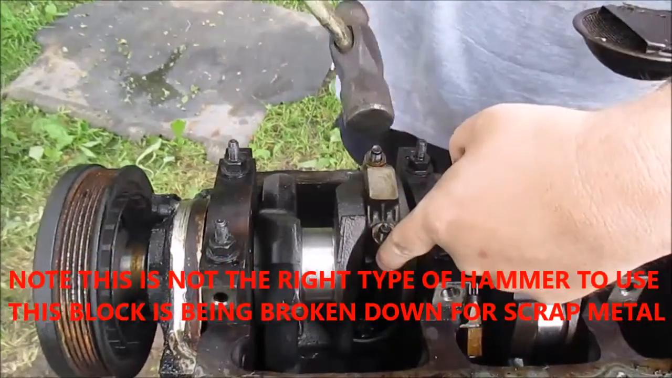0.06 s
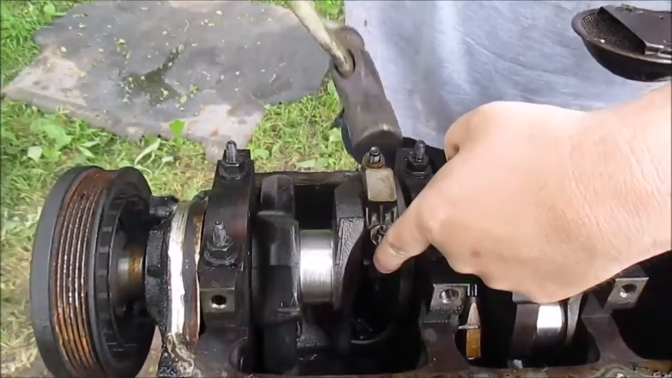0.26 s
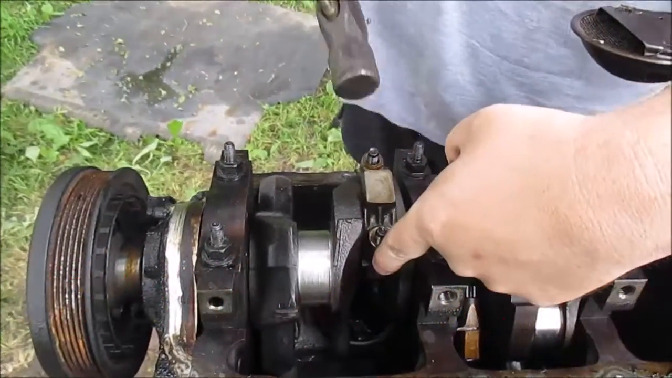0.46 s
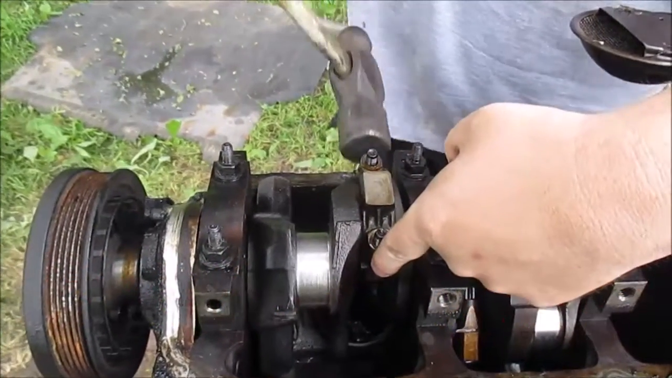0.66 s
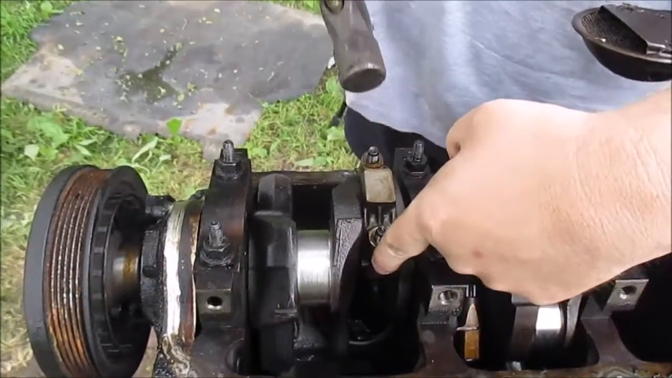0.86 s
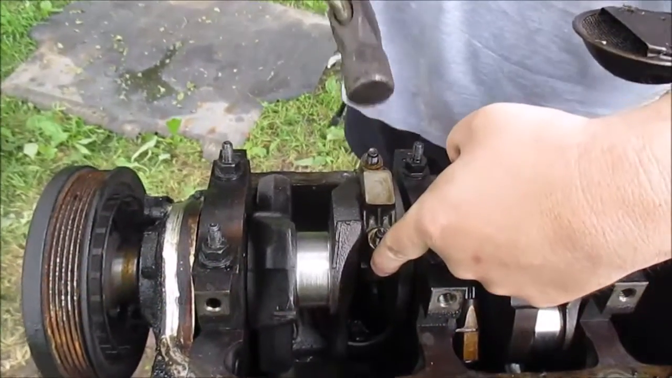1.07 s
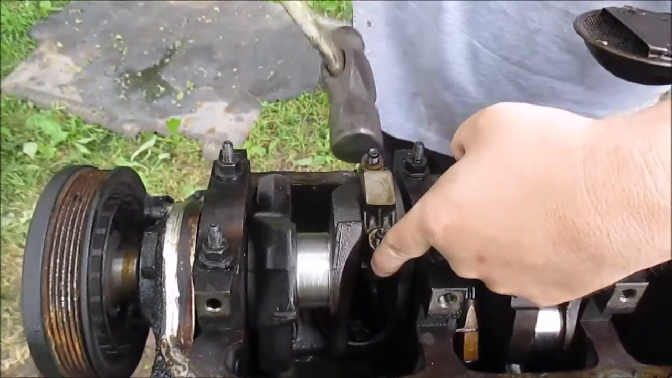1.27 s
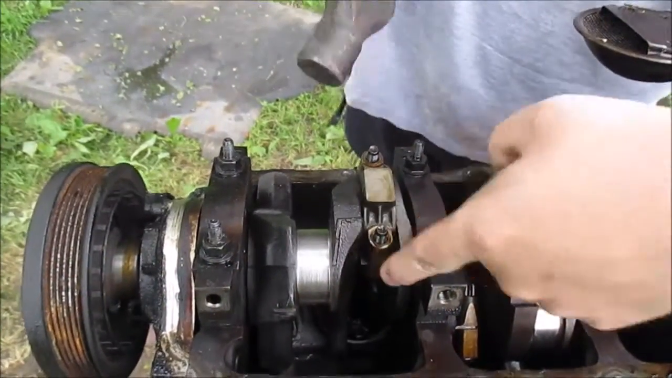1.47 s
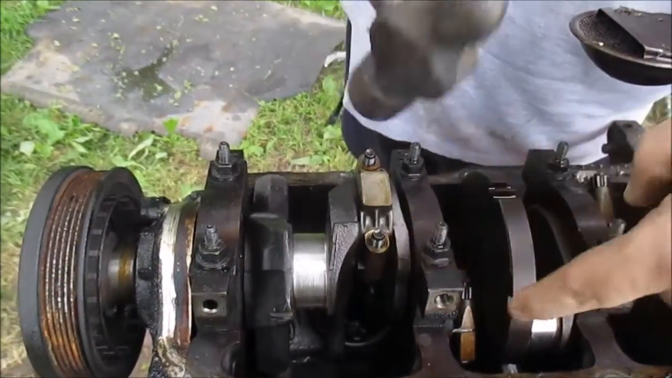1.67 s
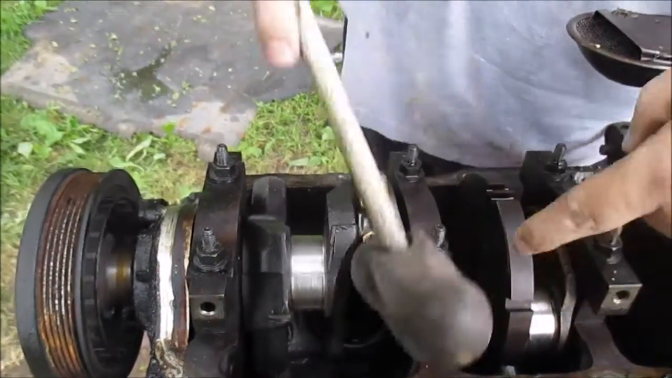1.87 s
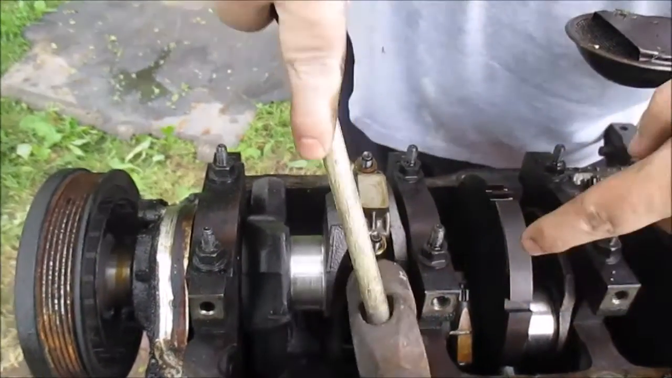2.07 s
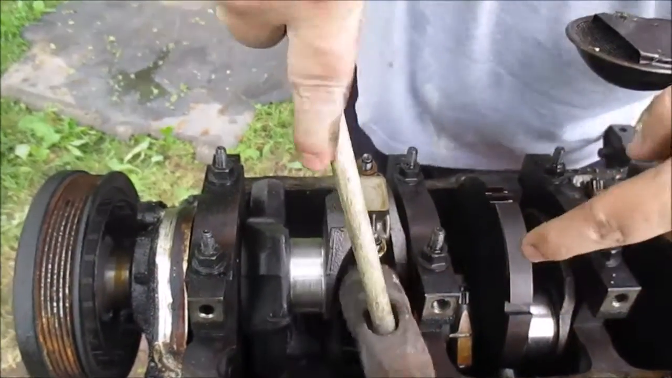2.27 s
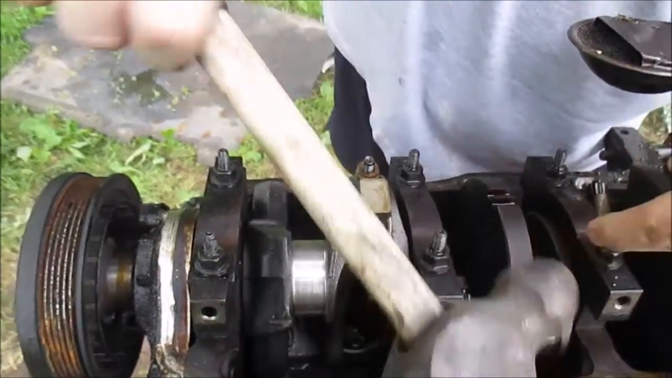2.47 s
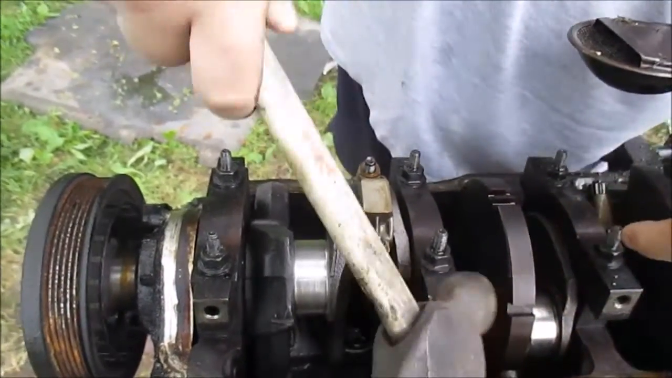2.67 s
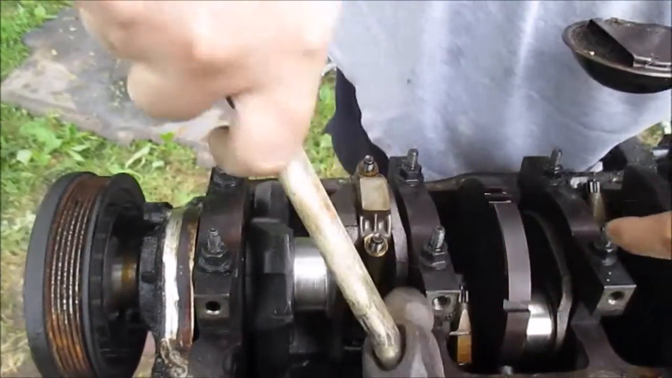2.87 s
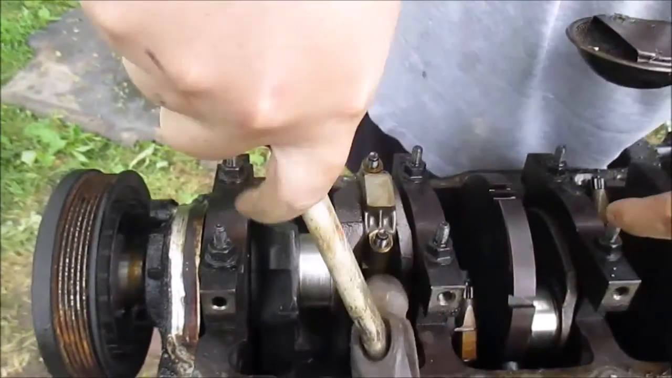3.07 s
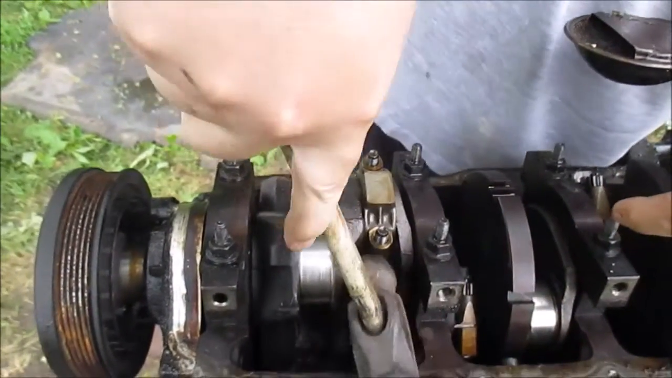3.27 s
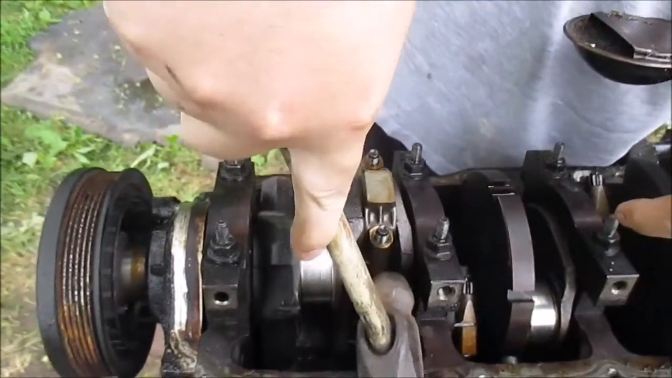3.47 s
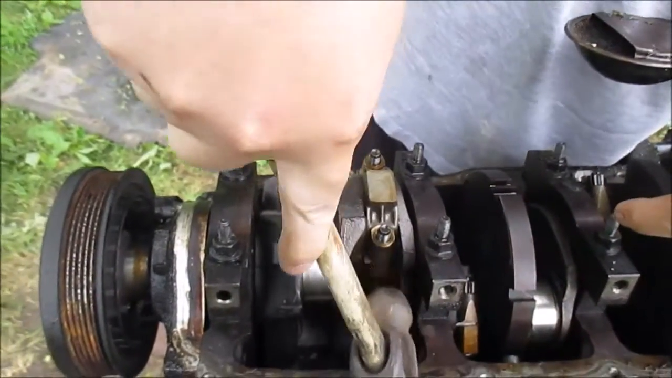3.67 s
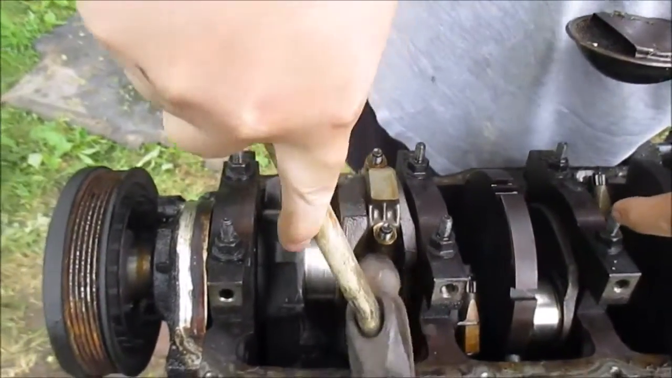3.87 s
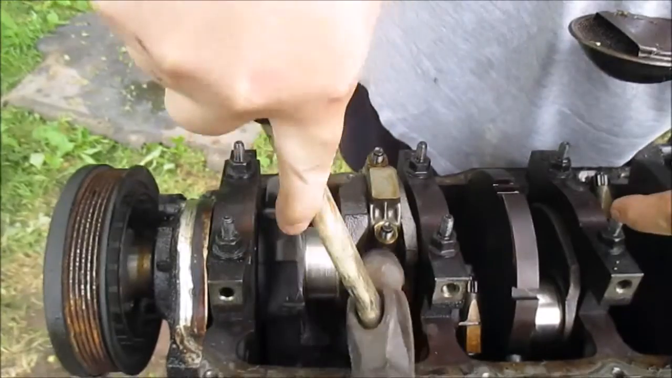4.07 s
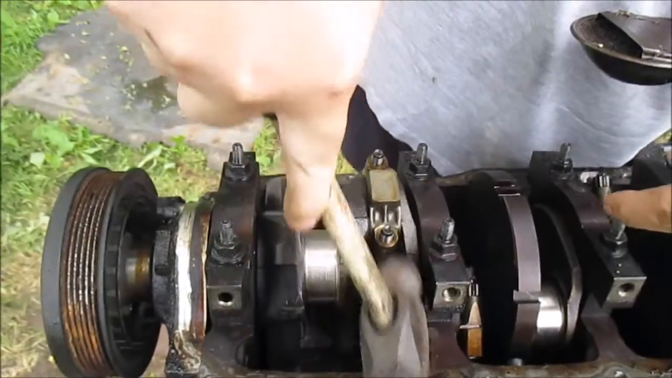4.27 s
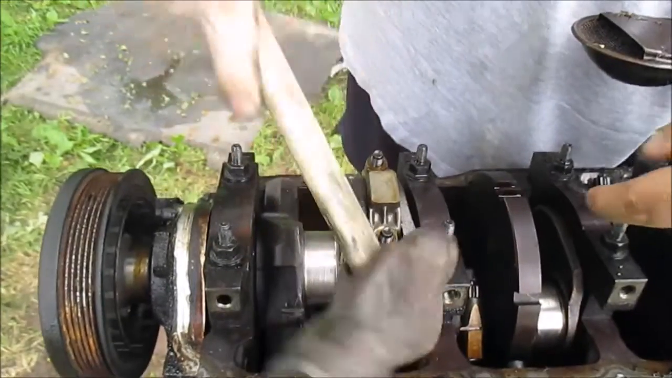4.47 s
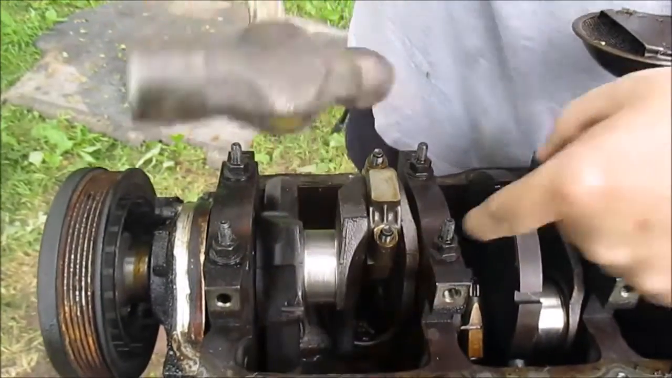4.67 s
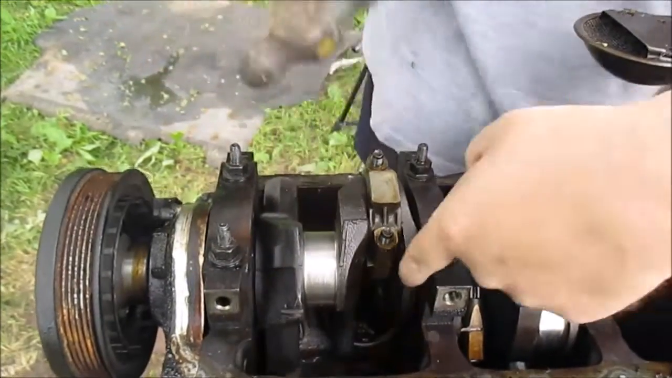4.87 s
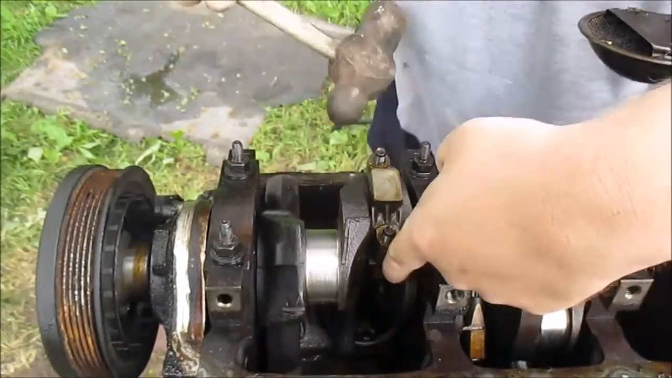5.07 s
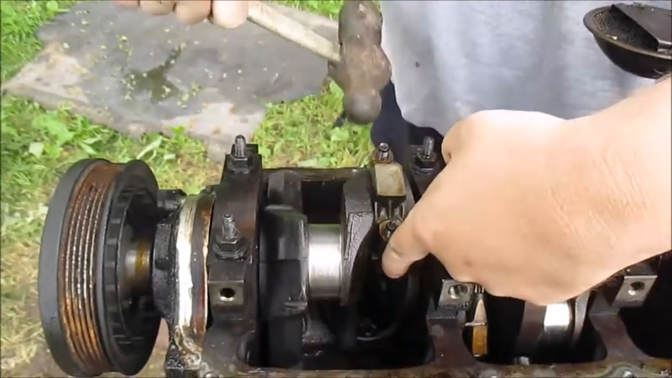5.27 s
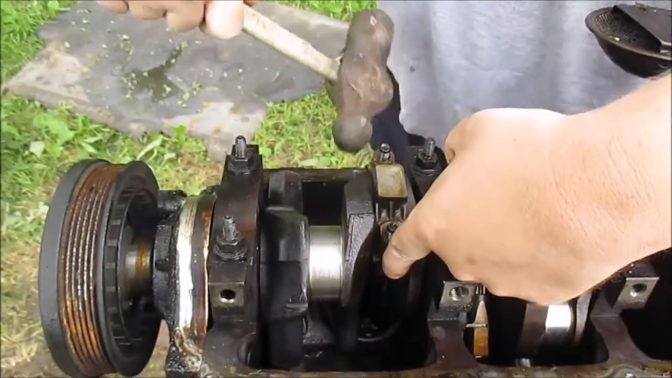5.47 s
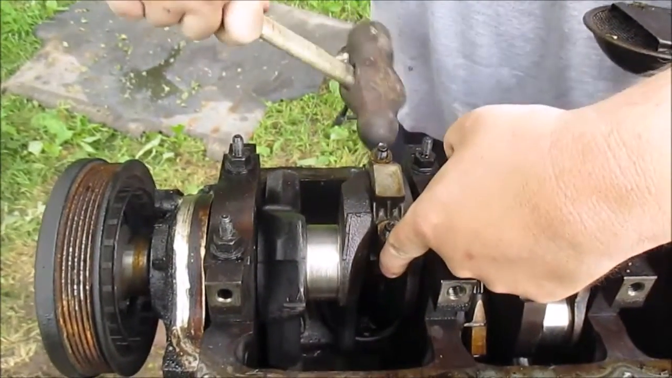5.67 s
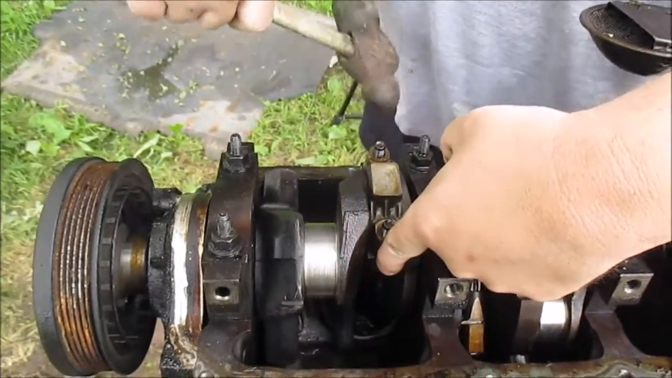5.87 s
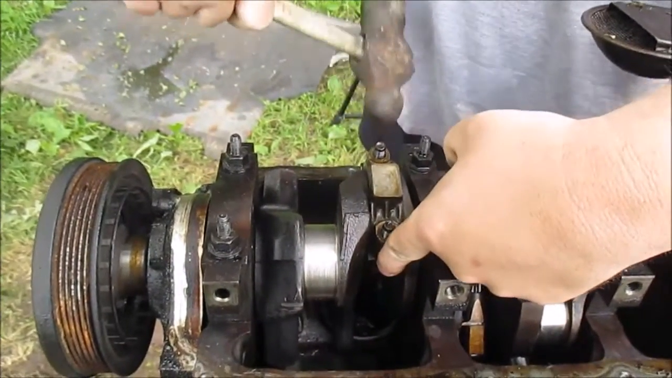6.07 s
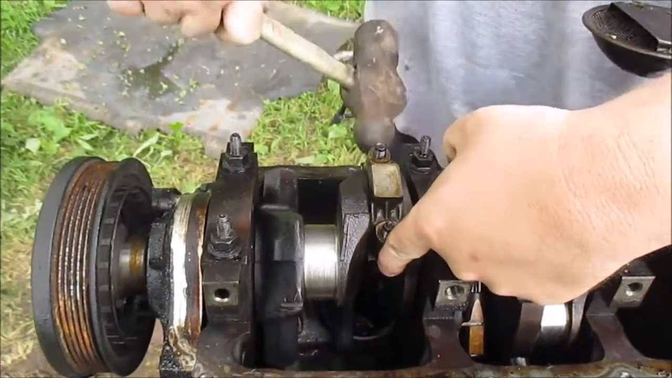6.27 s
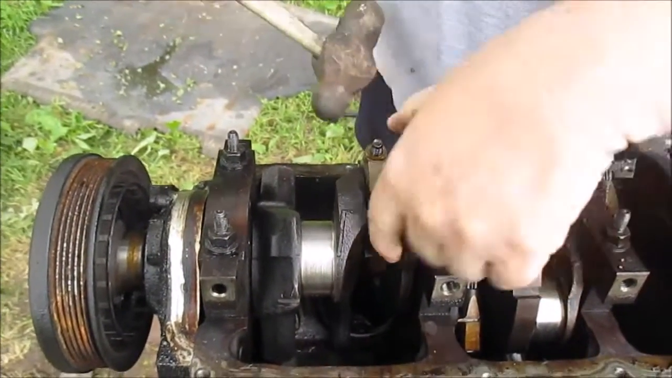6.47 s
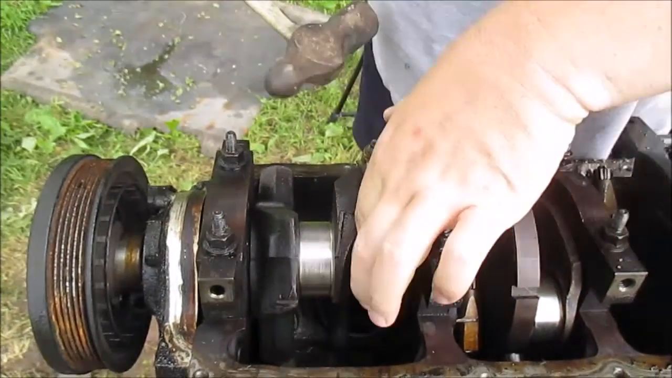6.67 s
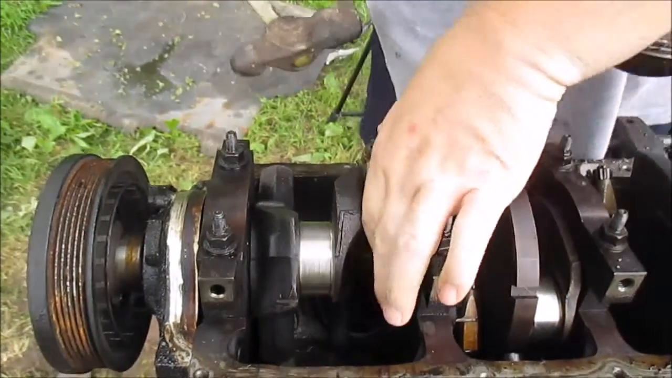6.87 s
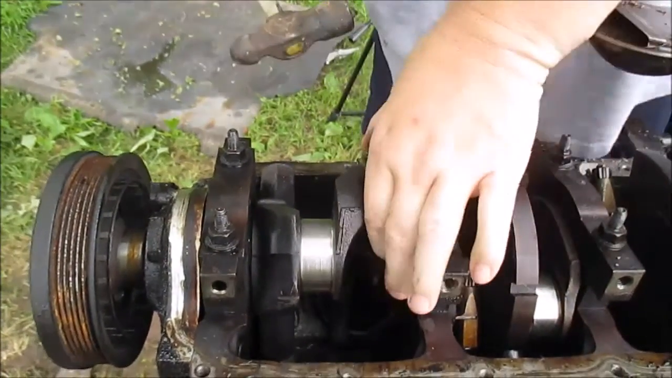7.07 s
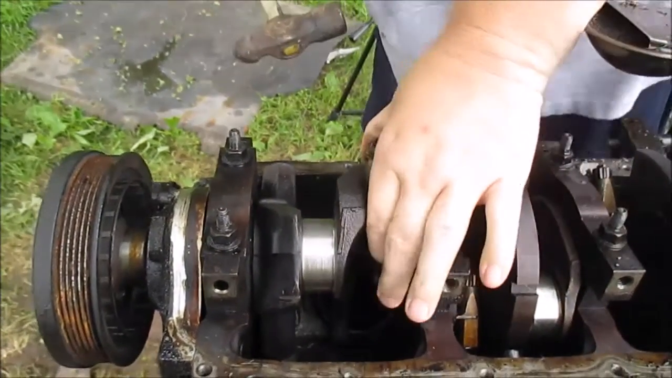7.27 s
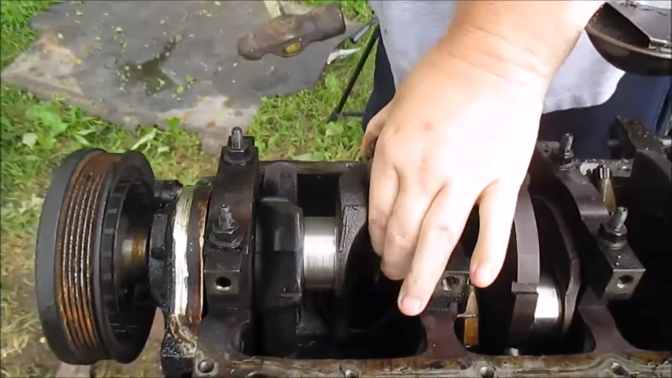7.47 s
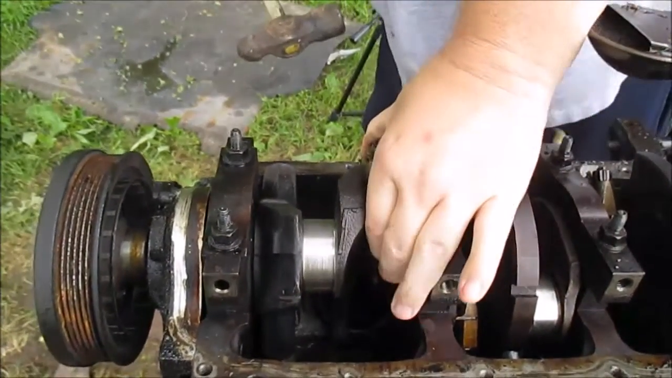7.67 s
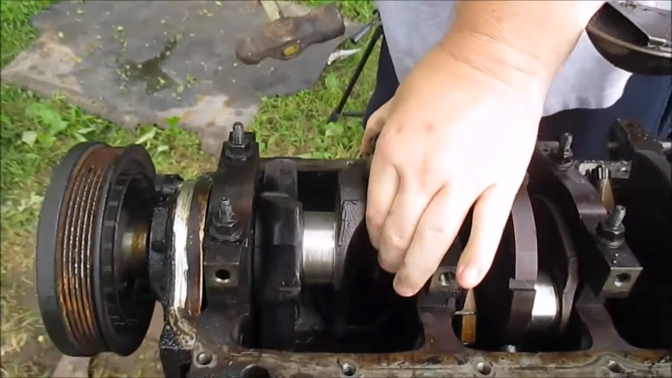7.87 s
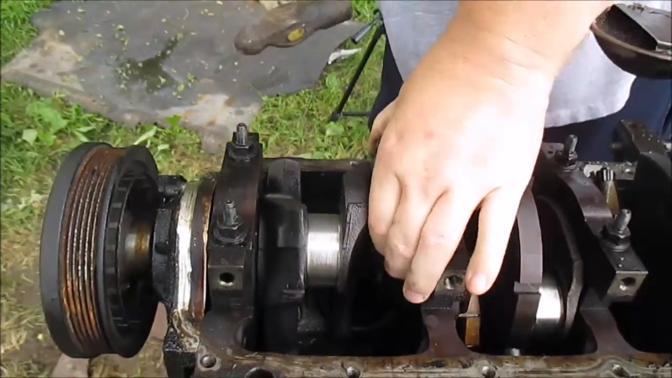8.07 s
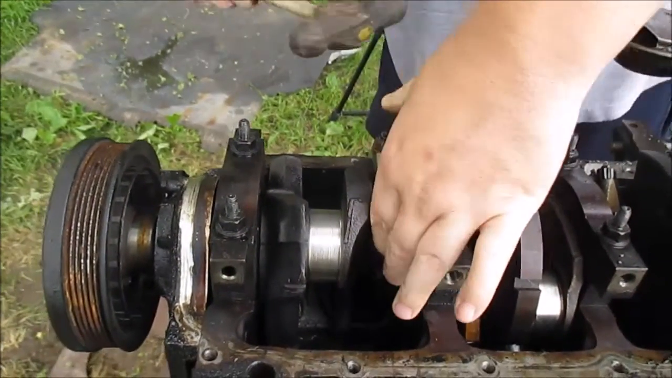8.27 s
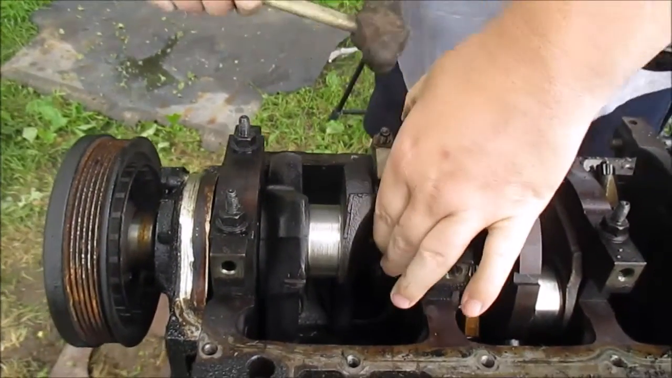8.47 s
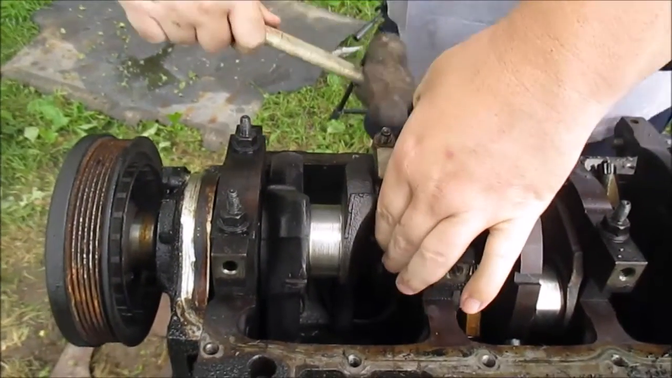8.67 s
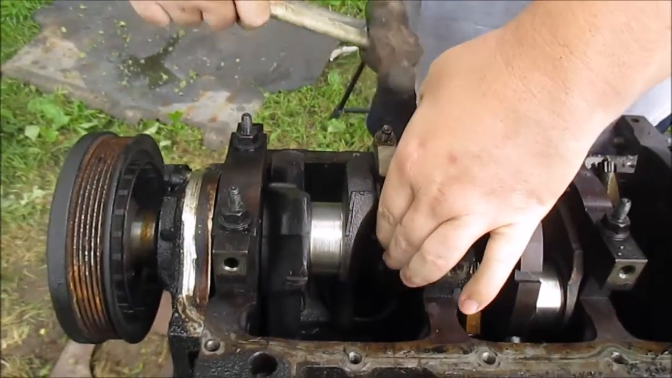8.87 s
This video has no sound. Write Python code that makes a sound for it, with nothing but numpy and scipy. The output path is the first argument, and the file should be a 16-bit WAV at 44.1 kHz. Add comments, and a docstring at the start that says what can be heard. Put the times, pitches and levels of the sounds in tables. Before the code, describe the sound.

Hard steel hits oily iron: short cracking clanks that die almost at once, with only a faint steel ring left over. Bright evenly spaced blows on a bolt, thuddier irregular ones deeper in the block, then bright ones again, a quiet gap with small ticks and a weak squeak, and a single final hit. Close overloading microphone, soft open air, low distant hum.

```python
"""A hammer knocks a connecting rod loose in a bare engine block on a lawn, in short runs of dry metallic blows.
Each blow is a spike, shaped noise and decaying modes: oily iron dies quickly, a few steel parts ring on faintly.
Loosened parts tick (short banded noise with a ring) and squeak once (two gliding partials).
Behind lie open air and breeze (filtered noise) and a far motor hum (wavering sines).
The close microphone overloads on hard blows; its gain control ducks the background, which then creeps back."""
import sys
import numpy as np
from scipy import signal
from scipy.fft import rfft, irfft, next_fast_len
from scipy.io import wavfile
from scipy.ndimage import uniform_filter1d, map_coordinates

SR = 44100
rng = np.random.default_rng(int(sys.argv[2]) if len(sys.argv) > 2 else 0)


def master(y):
    """Save y as 16-bit WAV."""
    cut = np.clip(np.atleast_2d(y).T, -1, 1)
    pcm = np.round(cut * 32767)  # scale
    wavfile.write(sys.argv[1], SR, pcm.astype(np.int16))


N = 392931
TIME = np.arange(N) / SR
AGE = TIME[:int(.7 * SR)]   # seconds since a blow or tick


def from_db(db):
    """Decibels to gain."""
    return 10 ** (np.asarray(db) / 20)


def rms_one(x):
    """Scale to unit power."""
    return x / np.sqrt(np.mean(x ** 2) + 1e-20)


def at_hz(points, hz):
    """Read a table on a log-frequency axis."""
    points = np.array(points)
    return np.interp(np.log(hz), np.log(points[:, 0]), points[:, 1])


def drift(rate):
    """Smooth chance with spread 1, from `rate` random knots per second."""
    knots = rng.standard_normal(int(rate * N / SR) + 4)
    return rms_one(map_coordinates(knots, [TIME * rate + 1], order=2, mode="nearest"))


def decay(t60):
    """A fall of 60 dB in t60 seconds, held once it is 240 dB down."""
    return from_db(-60 * np.minimum(AGE / t60, 4))


def coloured(x, spectra):
    """Filter by the sum of some dB spectra, at minimum phase so that nothing sounds early."""
    size = 2 * next_fast_len(len(x))
    hz = np.maximum(np.arange(size // 2 + 1) * SR / size, 1)
    total_db = sum(at_hz(points, hz) for points in spectra)
    cepstrum = irfft(np.log(from_db(total_db)))
    # fold the cepstrum onto positive time: this makes the phase minimal
    cepstrum[1:size // 2] *= 2
    cepstrum[size // 2 + 1:] = 0
    return irfft(rfft(x, size) * np.exp(rfft(cepstrum)), size)[:len(x)]


# All source levels below are set ahead of the microphone's gain control.

# relative spectrum of open air: pitch_hz [Hz], density_db [dB per Hz]
AIR_SPECTRUM = [(12, -21.5), (25, -12.5), (60, -0.5), (95, -3.5), (135, -3), (225, -2), (265, -9),
                (520, -13.5), (1100, -17), (1650, -25.5), (4000, -31), (4900, -40.5), (6000, -41.5),
                (12000, -65.5), (16000, -72)]
# level of the open air over time: time_s [s], level_db [dB]
AIR_SWELL = [(0, -34.5), (2.8, -32), (4.2, -34.5), (5.5, -34), (6.5, -36.5), (8.91, -37)]


def open_air():
    """A wash of air: coloured noise whose level moves slowly."""
    wash = rms_one(coloured(rng.standard_normal(N), [AIR_SPECTRUM]))
    time_s, level_db = np.transpose(AIR_SWELL)
    return wash * from_db(np.interp(TIME, time_s, level_db))


# puffs of breeze at the microphone: peak_s [s], level_db [dB]
PUFFS = [(.15, -37.5), (2.5, -36)]
GUST_WIDTH_S = .6   # from the peak to 1/e of it


def breeze(top_hz=220, lumpy_db=3.0):
    """Wind at the microphone: low noise with lumpy strength that swells and fades in puffs."""
    low_band = signal.butter(2, [40, top_hz], "band", fs=SR, output="sos")
    rumble = signal.sosfilt(low_band, rng.standard_normal(N))
    lumpy = rumble * from_db(lumpy_db * drift(9.2))
    swell = sum(from_db(level_db) * np.exp(-((TIME - peak_s) / GUST_WIDTH_S) ** 2)
                for peak_s, level_db in PUFFS)
    return rms_one(lumpy) * swell


# hum lines of far machinery: pitch_hz [Hz], level_db [dB]
HUM_LINES = [(86.1, -42), (172.3, -47.5), (229, -49), (335, -57.5), (476, -55.5), (3885, -71)]


def far_motor(fading_per_s=16):
    """Hum lines that waver in strength and phase on their way through the air."""
    hum = np.zeros(N)
    for pitch_hz, level_db in HUM_LINES:
        angle = 2 * np.pi * pitch_hz * TIME
        line = drift(fading_per_s) * np.sin(angle) + drift(fading_per_s) * np.cos(angle)
        hum += from_db(level_db) * line
    return hum


CONTACT_DB = -6.5


def contact_spike():
    """The instant of contact: one sample with a flat spectrum."""
    spike = 1. * (AGE == 0)
    return from_db(CONTACT_DB) * np.sqrt(SR / 2) * rms_one(spike)


def third_octaves(low_hz):
    """Band-passes up to 17 kHz: (centre Hz, width Hz, filter)."""
    edges = np.geomspace(low_hz, 17000, int(3 * np.log2(17000 / low_hz)) + 1)
    bands = []
    for low, high in zip(edges, edges[1:]):
        band = signal.butter(2, [low, high], "band", fs=SR, output="sos")
        bands.append((np.sqrt(low * high), high - low, band))
    return bands


# first crack, briefest in the treble: pitch_hz [Hz], t60_s [s]
CRACK_DECAY = [(500, .02), (3000, 0.017), (9000, 0.0097)]
# how long the dense ring of the block lasts: pitch_hz [Hz], t60_s [s]
BLOCK_DECAY = [(200, 0.14), (600, 0.16), (1300, 0.036), (3000, 0.039), (7000, 0.015), (14000, 0.016)]
# faint tail scattered back by the surroundings, which swallow the treble: pitch_hz [Hz], level_db [dB]
SCATTERED_TAIL = [(500, -23), (3500, -22), (6000, -26), (9000, -31), (14000, -29.5)]
# share of the crowd of short resonances between the modes: pitch_hz [Hz], level_db [dB]
DENSE_SHARE = [(250, -3), (700, -5.5), (2500, -1), (6000, -2.5), (12000, -1.5)]
CRACK_DB, BODY_DB = -4.5, -6.5   # balance against the tail within each band
TAIL_T60_S = .17


def dense_ring(bands):
    """Crowded resonances as noise bands, each with a crack, a body and a tail that die at their own rates."""
    out = np.zeros(len(AGE))
    white = rng.standard_normal((2, len(AGE)))
    for k, (hz, width, band) in enumerate(bands):
        stages = [(CRACK_DB, at_hz(CRACK_DECAY, hz)), (BODY_DB, at_hz(BLOCK_DECAY, hz)),
                  (at_hz(SCATTERED_TAIL, hz), TAIL_T60_S)]
        power = sum((from_db(db) * rms_one(decay(t60))) ** 2 for db, t60 in stages)
        noise = signal.sosfilt(band, white[k % 2] * np.sqrt(power))   # neighbours use different noise
        out += from_db(at_hz(DENSE_SHARE, hz)) * np.sqrt(width) * rms_one(noise)
    return out


MODE_SPREAD_DB = 1.5


def mode(hz, db, t60):
    """A ringing mode; about 0 dB it carries as much as unit-density noise over a tenth of its frequency."""
    share = from_db(db + rng.normal(0, MODE_SPREAD_DB)) * rng.choice([-1, 1])   # no two blows land alike
    return share * np.sqrt(hz / 10) * rms_one(np.sin(2 * np.pi * hz * AGE) * decay(t60))


# modes of block, crank and rod, with relative levels by place struck:
# pitch_hz [Hz], t60_s [s], bolt_db [dB], crankcase_db [dB]
IRON_MODES = [(335, 0.033, -5.5, 9), (391, 0.34, -3.5, -14), (523, .1, 2, -8.5), (623, 0.051, -2, 5),
              (744, 0.077, -1.5, 4.5), (865.4, 0.049, 2, 6.5), (1024, 0.089, 0.5, -0.5),
              (1113, 0.22, -13.5, -7), (1160, 0.017, 3.5, -2.5), (1285.5, 0.042, 0.5, -6),
              (1390, 0.011, -7.5, 5.5), (1620, .08, -2, -4), (1712, .05, 0, 6.5), (2017, 0.052, -2.5, -6.5),
              (2250, 0.011, -5, 1), (2514, 0.088, -8.5, -14), (2720, 0.02, 1, -0.5),
              (2890, 0.02, 6.5, -20.5), (3266, 0.041, 2, -4), (3440, .07, -9, -16.5), (3820, 0.04, -5.5, 0),
              (4800, 0.012, -2, 0), (4956, 0.028, 4, -9), (5830, 0.028, -4, -8), (7080, 0.037, -9, -1.5),
              (8670, 0.021, -5, 2)]
MODES_DB = -1.5         # added to every level in the table
SEATING_SHIFT = .005    # the parts seat differently after each blow: spread of pitch, as a share


def iron_modes(place):
    """Short modes of the iron, weighted by where the blow lands."""
    return sum(mode(hz * rng.normal(1, SEATING_SHIFT), MODES_DB + place_db[place], t60)
               for hz, t60, *place_db in IRON_MODES)


# steel parts that ring on: pitch_hz [Hz], relative level_db [dB], t60_s [s]
STEEL_MODES = [(1817, -17.5, 1.2), (1872, -25, .5), (7235, -25, .22), (7720, -22, .14)]


def steel_ring(linger_db):
    """A few steel parts that ring on after the iron is still."""
    return sum(mode(hz, linger_db + db, t60) for hz, db, t60 in STEEL_MODES)


CONTACT_FALL_DB_PER_OCTAVE = 24.5       # above 1 / contact time
THUD_FULL_HZ, THUD_END_HZ = 456, 1100   # the weight acts on the bass and is gone by the mids


def contact_colour(contact_ms, thud_db):
    """Spectrum of one contact, (Hz, dB): its weight shelves the bass, a longer touch dulls the treble."""
    hz = np.geomspace(100, 17000, 60)
    corner_hz = 1000 / contact_ms
    fall_db = CONTACT_FALL_DB_PER_OCTAVE * np.log2(hz / corner_hz)
    roll_off_db = -10 * np.log10(1 + 10 ** (fall_db / 10))
    shelf_db = at_hz([(THUD_FULL_HZ, thud_db), (THUD_END_HZ, 0)], hz)
    return np.column_stack([hz, roll_off_db + shelf_db])


# relative spectrum of a plain blow: pitch_hz [Hz], density_db [dB per Hz]
BLOCK_SPECTRUM = [(60, -27), (200, -12.5), (350, -9), (550, -2.5), (750, -3.5), (1200, 1.5), (1600, -6),
                  (2200, -3.5), (2900, -4.5), (4000, -6), (5500, -14), (8700, -21.5), (9900, -34.5),
                  (16000, -44.5)]
# what a perfectly hard contact adds on the rod bolt, then in the crankcase: pitch_hz [Hz], level_db [dB]
PLACE_SPECTRA = [
    [(1100, 1), (1800, 2.5), (2500, -0.5), (5200, 4), (9000, 8.5), (14000, 10.5)],
    [(1100, -1.5), (1800, 0.5), (2500, 0.5), (5200, 0.5), (9000, 6.5), (14000, 6.5)],
]


def blow(colour, linger_db, place, bands):
    """One contact sets off the dense ring and the modes; block, place and contact colour them all."""
    out = contact_spike() + dense_ring(bands) + iron_modes(place) + steel_ring(linger_db)
    out = coloured(out, [BLOCK_SPECTRUM, PLACE_SPECTRA[place], colour])
    return out / np.sqrt(np.mean(out[:int(.008 * SR)] ** 2))   # unit level over the first 8 ms


# hammer blows: start_s [s], level_db over the first 8 ms [dB], contact_ms [ms], thud_db [dB],
# place [0 rod bolt, 1 inside the crankcase]
HAMMER_BLOWS = [(.298, -9.5, 0.14, -2, 0), (0.6491, -2, 0.06, 2, 0), (.977, 2.5, 0.12, -0.5, 0),
                (1.273, 4, 0.13, -5.5, 0), (2.1585, -5.5, 0.2, 12, 1), (3.1947, -12, 0.24, 4.5, 1),
                (3.2488, -25.5, 0.34, -5, 1), (3.534, -6, 0.16, -1.5, 1), (3.6584, -19, 0.45, 5.5, 1),
                (3.7958, -1.5, 0.15, 3, 1), (4.0799, -1, 0.19, 2, 1), (4.333, 0, 0.15, 5, 1),
                (5.3998, -6, 0.14, -4.5, 0), (5.7268, -2, 0.13, -3.5, 0), (6.0063, -0.6, 0.076, 0.5, 0),
                (6.2626, -0.43, 0.079, 3.5, 0), (8.7412, -7.5, 0.2, 2, 0)]
# ring of the steel parts at 0 s, added to their levels: struck on the bolt, inside the crankcase [dB]
STEEL_RING_DB = [-5, -3.5]
RING_LOSS_DB_PER_S = 1.2   # they ring less as the rod works loose


def hammer():
    """All blows, each coloured by where it lands, how briefly and how heavily."""
    out = np.zeros(N + len(AGE))
    bands = third_octaves(110)
    for start_s, level_db, contact_ms, thud_db, place in HAMMER_BLOWS:
        place, start = int(place > .5), int(start_s * SR)
        linger_db = STEEL_RING_DB[place] - RING_LOSS_DB_PER_S * start_s
        knock = blow(contact_colour(contact_ms, thud_db), linger_db, place, bands)
        out[start:start + len(AGE)] += from_db(level_db) * knock
    return out[:N]


GROUND_DELAY_S, GROUND_DB, GROUND_CUT_HZ = 0.011, -19, 2000


def ground_echo(x):
    """The lawn sends back one dull copy."""
    late = np.interp(TIME - GROUND_DELAY_S, TIME, x, left=0)
    dull = signal.butter(1, GROUND_CUT_HZ, fs=SR, output="sos")
    return from_db(GROUND_DB) * signal.sosfilt(dull, late)


# small ticks of loose metal: start_s [s], level_db of the noise before its octave filter [dB],
# pitch_hz [Hz], t60_s [s], ring_db of the sine's peak against that noise [dB]
LOOSE_TICKS = [(5.403, -36, 7250, 0.076, 4), (5.433, -22, 2900, 0.043, -14), (7.7092, -28, 1365, 0.02, 4),
               (7.828, -34, 1500, .035, -2), (8.012, -37, 3530, .08, -16)]


def ticks():
    """Loosened parts shift and touch: decaying noise and a pure ring, held to one octave."""
    out = np.zeros(N + len(AGE))
    for start_s, level_db, hz, t60, ring_db in LOOSE_TICKS:
        start = int(start_s * SR)
        octave = signal.butter(4, [hz / np.sqrt(2), hz * np.sqrt(2)], "band", fs=SR, output="sos")
        ring = from_db(ring_db) * np.sin(2 * np.pi * hz * AGE)
        touch = (rng.standard_normal(len(AGE)) + ring) * decay(t60)
        out[start:start + len(AGE)] += from_db(level_db) * signal.sosfilt(octave, touch)
    return out[:N]


SQUEAK_START_S, SQUEAK_LENGTH_S, SQUEAK_DB = 8.38, 0.31, -62
SQUEAK_HZ, SQUEAK_SAG = 2400, .11   # unheard fundamental before it sags, and the share it sags by


def squeak(waver=.0064, overtone_db=-7):
    """A loosened part slides: one thin swell that sags in pitch, heard in its second and third partials."""
    swell = np.sin(np.pi * np.clip((TIME - SQUEAK_START_S) / SQUEAK_LENGTH_S, 0, 1))
    pitch_hz = SQUEAK_HZ * (1 - SQUEAK_SAG * swell ** 2) * (1 + waver * drift(150))
    phase = 2 * np.pi * np.cumsum(pitch_hz) / SR
    second, third = np.sin(2 * phase), np.sin(3 * phase)
    return from_db(SQUEAK_DB) * swell * (second + from_db(overtone_db) * third)


def scene():
    """Hammer and loosened parts close by, open air and motor behind."""
    background = open_air() + breeze() + far_motor()
    knocks = hammer()
    return (background + knocks + ground_echo(knocks) + ticks() + squeak())[None]


GAIN_KNEE_DB, GAIN_SLOPE = -17, 0.73   # gain reduction in dB per dB above the knee
RELEASE_DB_PER_S, ATTACK_S = 5, 0.039


def gain_control(x):
    """Loud sound pulls the gain down within a few hundredths of a second; it recovers over seconds."""
    power = uniform_filter1d(x[0] ** 2, int(.004 * SR))   # 4 ms average
    level_db = 10 * np.log10(np.maximum(power, 1e-12))
    wanted_db = GAIN_SLOPE * np.maximum(level_db - GAIN_KNEE_DB, 0)
    # hold the deepest reduction, letting it go at a steady rate
    released_db = RELEASE_DB_PER_S * TIME
    held_db = np.maximum.accumulate(wanted_db + released_db) - released_db
    r = np.exp(-1 / (ATTACK_S * SR))
    return x * from_db(-signal.lfilter([1 - r], [1, -r], held_db))


CUTOFF_HZ = 16200


def record(dry):
    """Gain control, overload at full scale, and the top cut off."""
    x = gain_control(dry)
    clipped = x / (1 + x ** 8) ** (1 / 8)
    return signal.sosfilt(signal.ellip(10, .1, 80, CUTOFF_HZ, fs=SR, output="sos"), clipped)


dry = scene()
out = record(dry)
master(out)
```